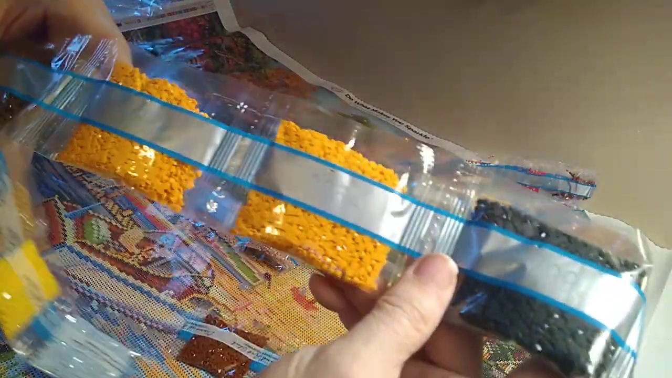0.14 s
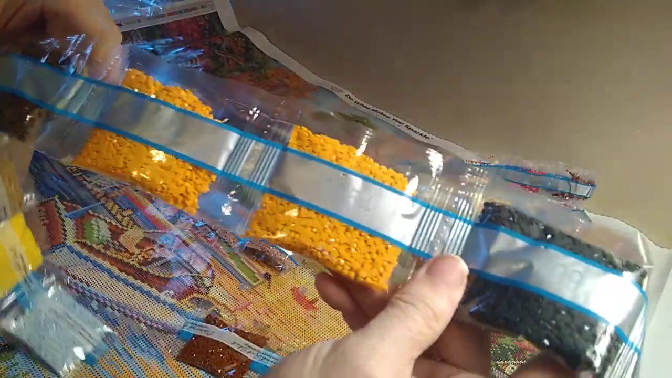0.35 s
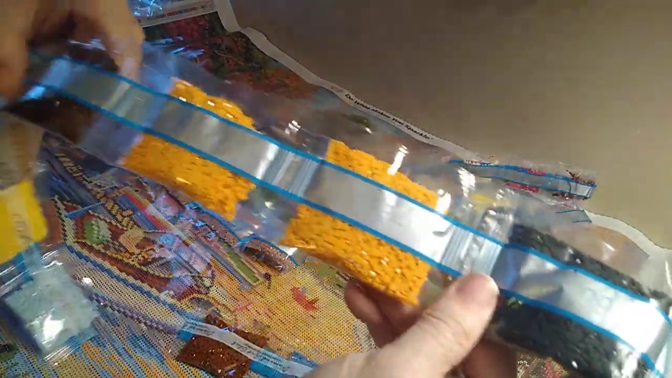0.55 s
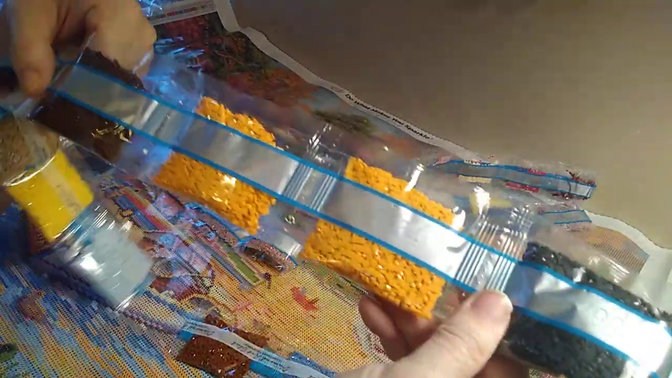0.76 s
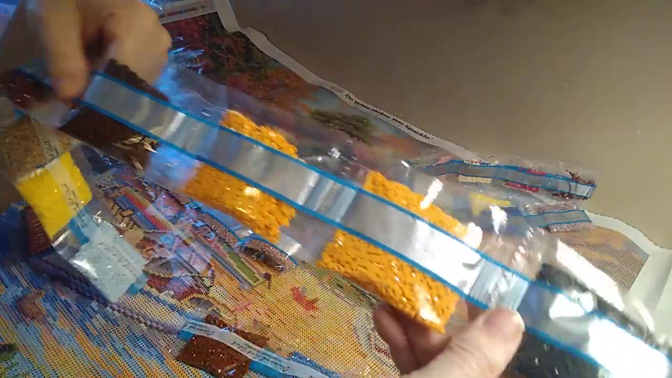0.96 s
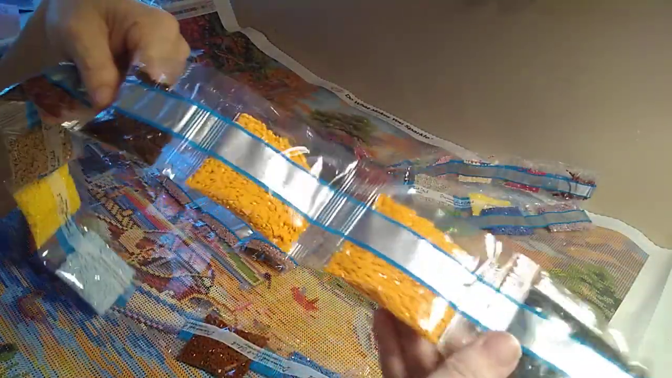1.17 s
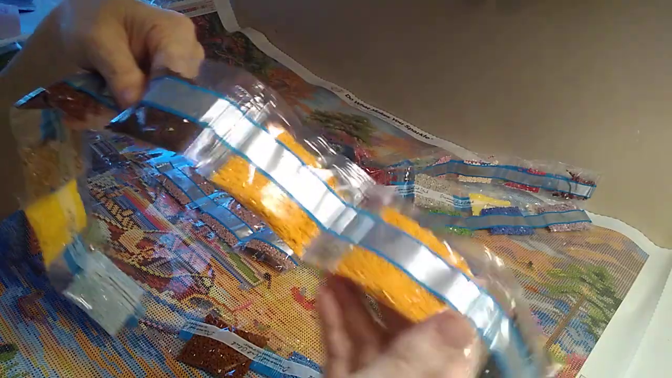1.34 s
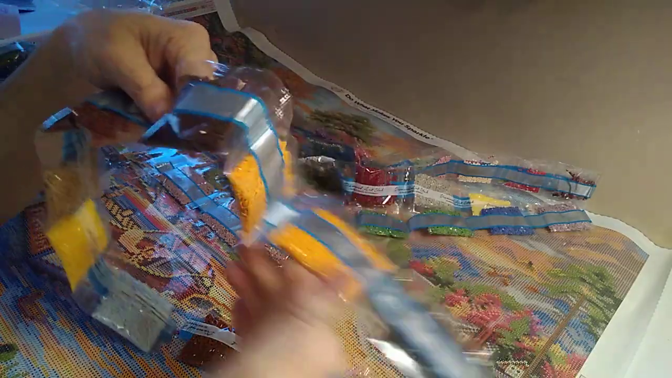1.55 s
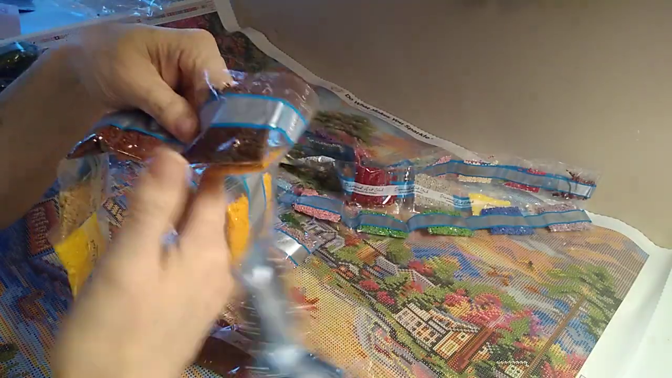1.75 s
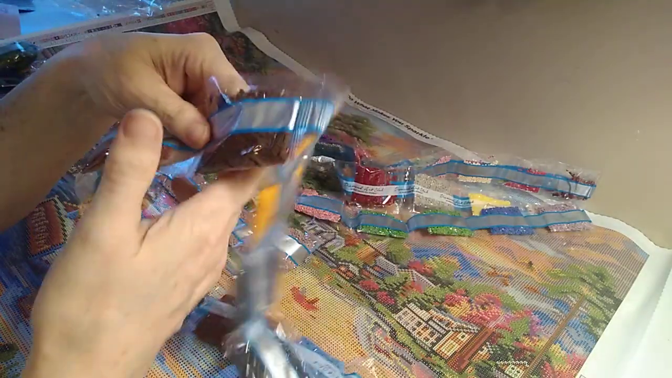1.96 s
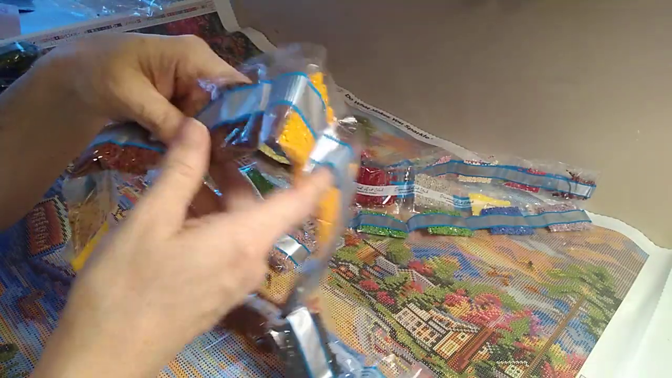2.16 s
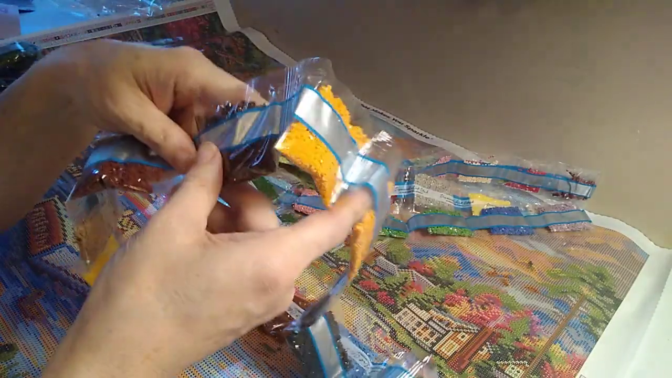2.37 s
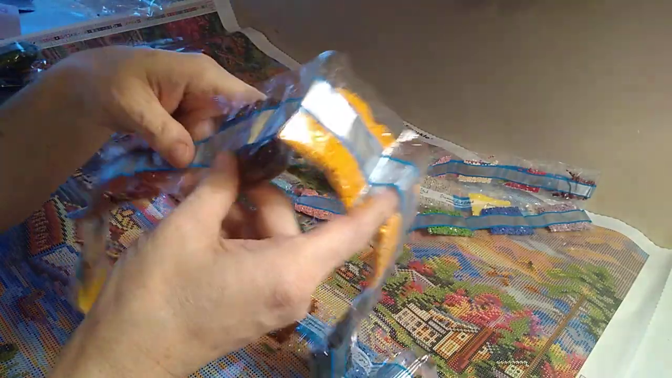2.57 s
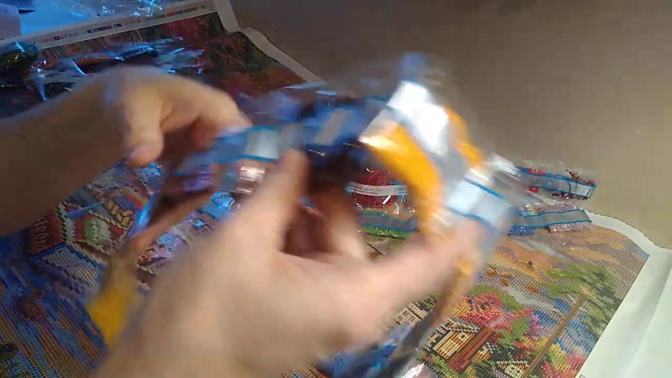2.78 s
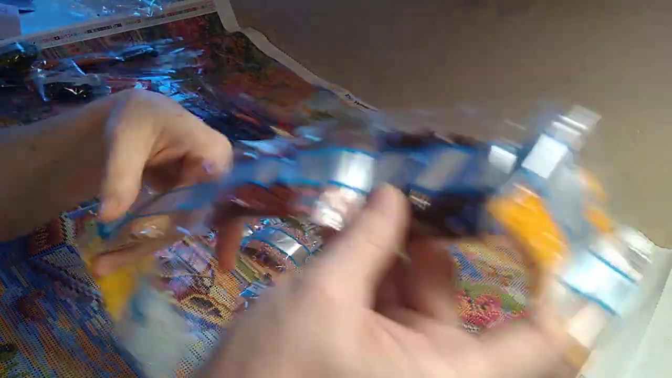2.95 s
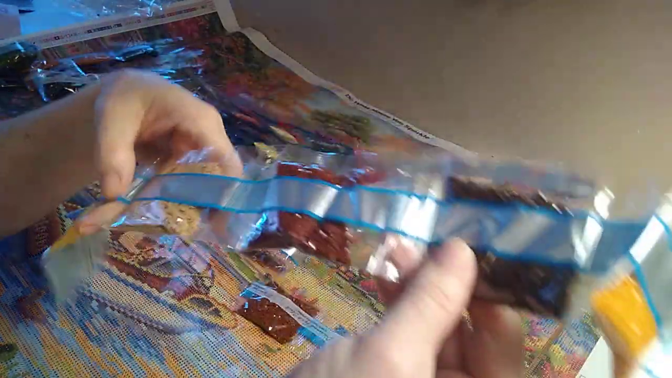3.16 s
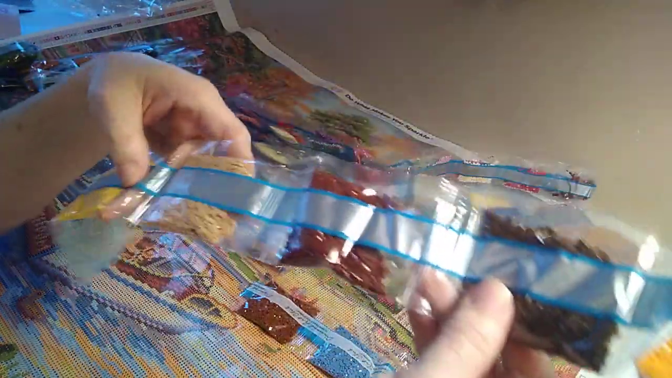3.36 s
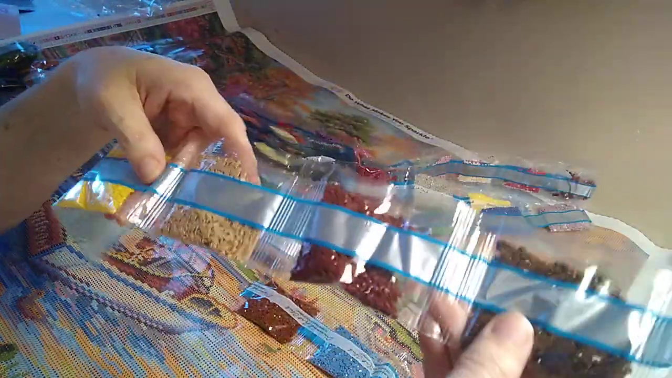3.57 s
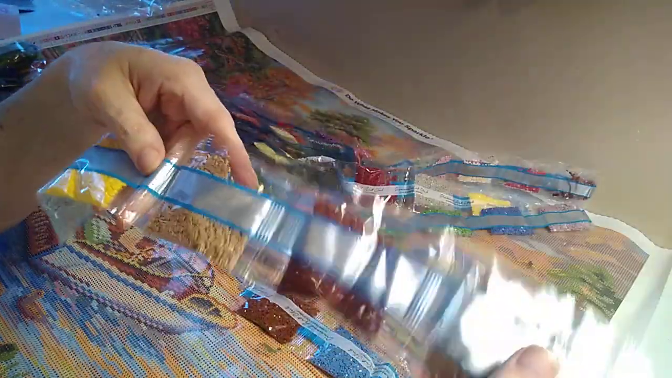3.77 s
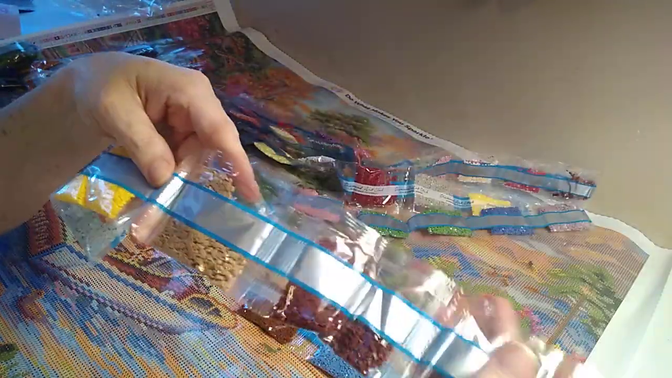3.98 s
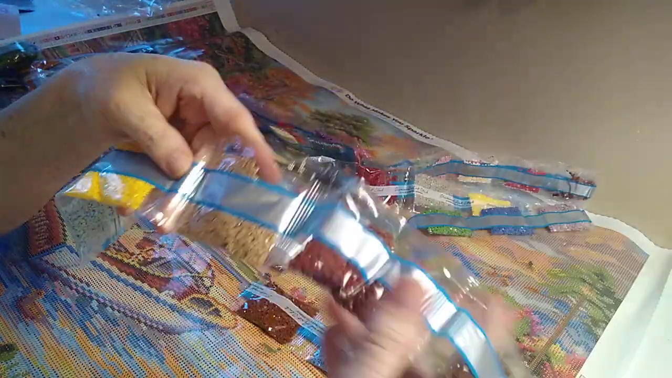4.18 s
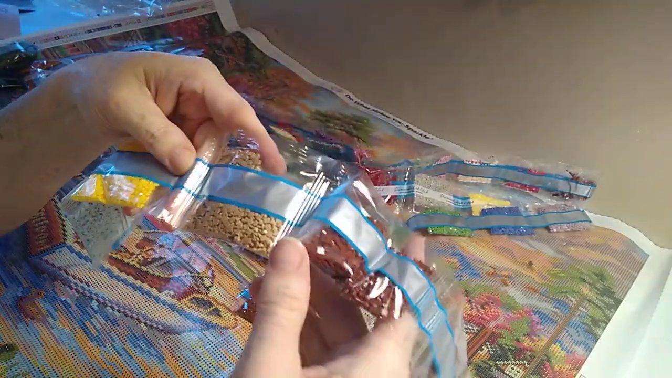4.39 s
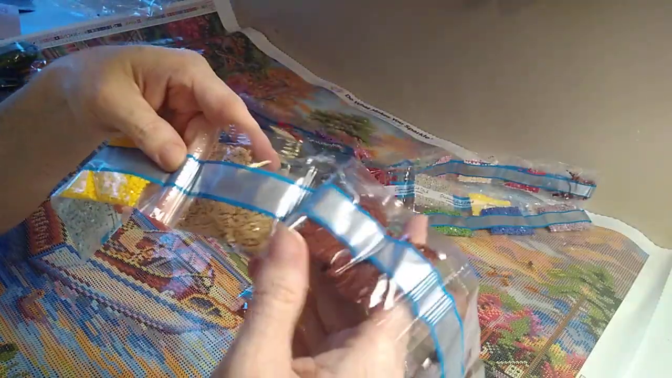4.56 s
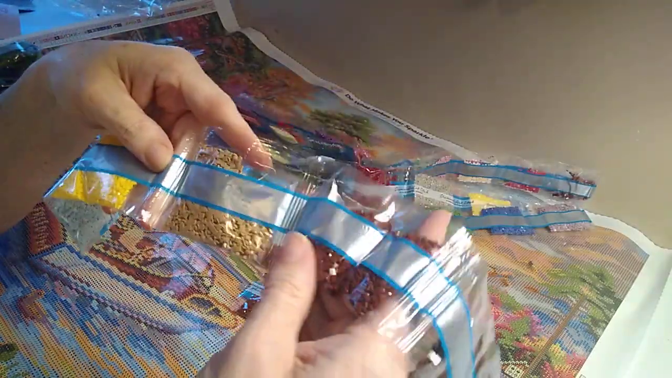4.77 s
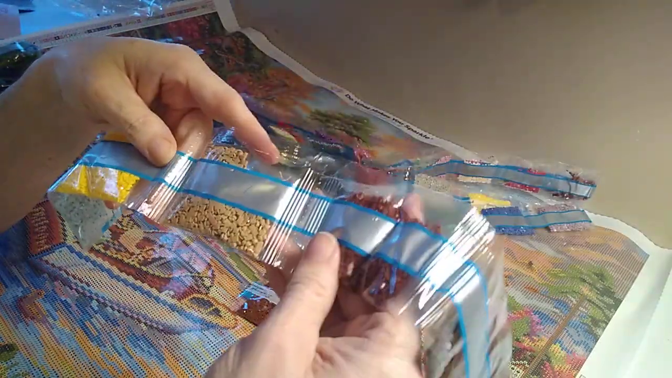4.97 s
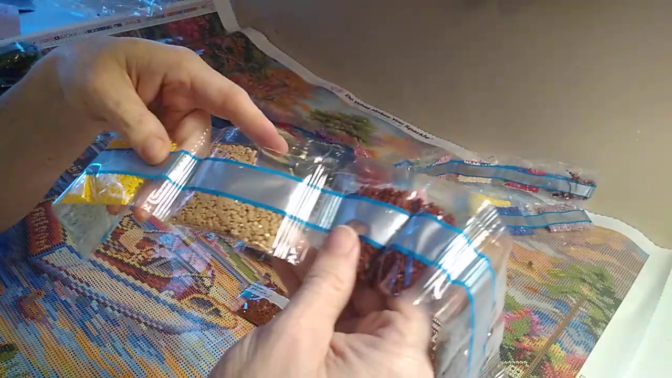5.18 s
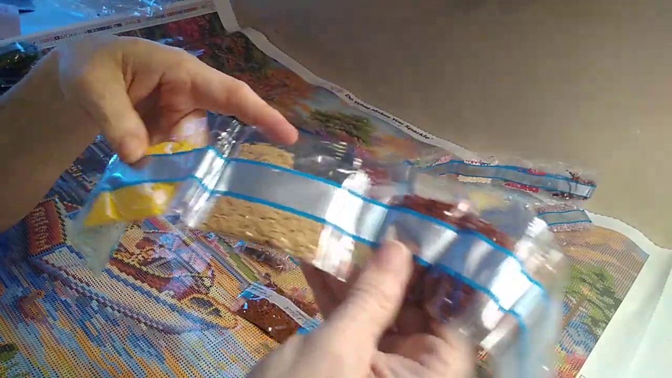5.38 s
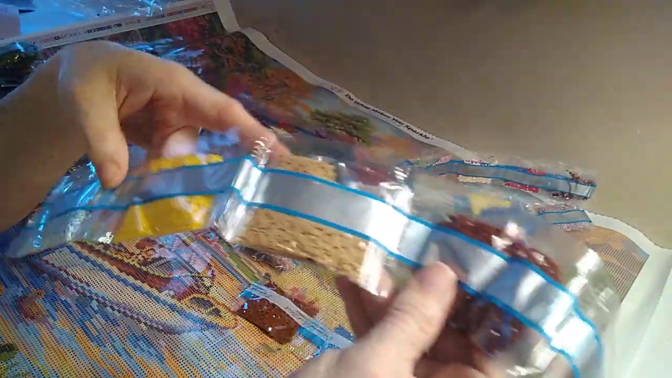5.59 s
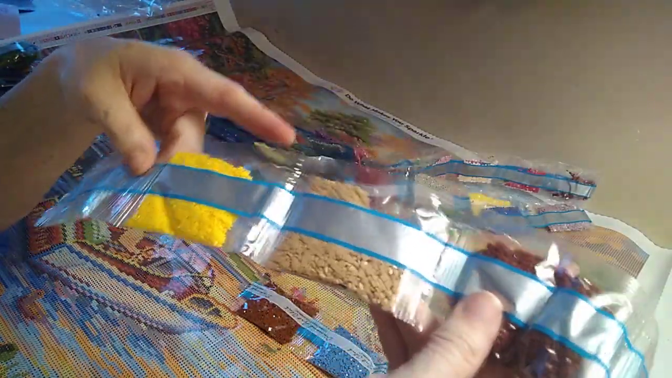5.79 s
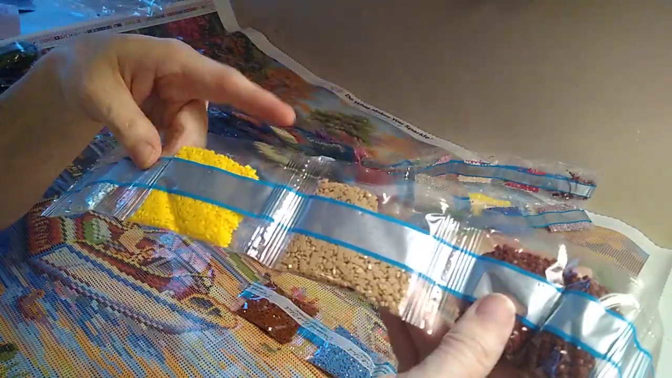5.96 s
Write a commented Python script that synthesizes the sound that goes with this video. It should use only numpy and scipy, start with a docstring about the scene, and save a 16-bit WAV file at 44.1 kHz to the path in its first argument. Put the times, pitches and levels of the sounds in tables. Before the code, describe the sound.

A strip of stiff plastic bags full of tiny beads is handled close to a stereo microphone above a table in a small room. From 0 to 1 s there are light crackles and separate snaps, beginning near 0.2 s. From 1 to 2.4 s the creases snap faster, with bright crinkling and grainy bead ticking leaning left; a sharp crack stands out near 1.95 s. Around 2.7 to 3.05 s come the strongest cracks, with bag walls popping at 2.7 and 2.8 s. Bursts continue at 3.2 and 3.55 s, then a dense cluster from 3.8 to 4.2 s, well to the left. After a brief lull near 4.6 s, sparser snaps follow around 5 s, fading into small ticks and soft rustle by 6 s. Short table reflections and a quick room tail surround it, with a faint, steady low fan hum throughout.

```python
"""Strip of bead bags turned by hand

A strip of small plastic bags full of beads is turned over by hand above a table, close to the microphones.
Creases in the stiff film snap and smaller ones tick: each is an impulse with a short noisy flutter.
Dense random clicks make the crackle and the shifting beads; a bag wall popping through is one pressure swing.
Early echoes and a decaying noise tail give the table and a small room; a fan of sines and noise hums behind."""
import sys
import numpy as np
from scipy import signal
from scipy.fft import rfft, irfft, next_fast_len
from scipy.io import wavfile

SR = 44100
rng = np.random.default_rng(int(sys.argv[2]) if len(sys.argv) > 2 else 0)


def store_wav(level_fs):
    """Save 16-bit WAV to argv[1]."""
    pcm = np.round(np.clip(np.atleast_2d(level_fs), -1, 1) * 32767)
    wavfile.write(sys.argv[1], SR, pcm.T.astype(np.int16))


N = 265923
TIME = np.arange(N) / SR
# left and right shares of a left-minus-right level in dB
SIDES = np.array([[.5], [-.5]])


def undb(db):
    """Decibels to gain."""
    return 10 ** (np.asarray(db) / 20)


def curve(table, t):
    """The columns of a table, interpolated at times t."""
    times, *columns = np.transpose(table)
    return [np.interp(t, times, column) for column in columns]


def shape(points, hz):
    """A (frequency [Hz], level [dB]) spectrum read on a log frequency axis."""
    f, db = np.transpose(points)
    return np.interp(np.log(hz + 1), np.log(f), db)


def colour(x, points):
    """Filter with the given (frequency [Hz], level [dB]) spectrum, made causal by folding its cepstrum."""
    size = 2 * next_fast_len(x.shape[-1])
    bins_hz = np.arange(size // 2 + 1) * SR / size
    cepstrum = irfft(shape(points, bins_hz) * np.log(10) / 20)
    # minimum phase: double the first half, drop the second
    cepstrum[1:size // 2] *= 2
    cepstrum[size // 2 + 1:] = 0
    response = np.exp(rfft(cepstrum))
    return irfft(rfft(x, size) * response)[..., :x.shape[-1]]


def unit(x):
    """Scale to rms 1."""
    return x / np.sqrt(np.mean(x ** 2))


def walk(rate):
    """Slow random curve with a spread near 1 and the given number of knots per second."""
    knots = np.arange(0, N / SR + 1, 1 / rate)
    return np.interp(TIME, knots, rng.standard_normal(len(knots))) * np.sqrt(3 / 2)


def add(out, s, sound):
    """Mix a sound in at time s."""
    start = int(np.clip(round(s * SR), 0, N - 1))
    out[:, start:start + sound.shape[1]] += sound[:, :N - start]


SHAFT_HZ = 18.585
# hum of the fan: (multiple of the shaft rate, level [dB])
FAN_TONES = [(3, -63), (5, -64.5), (10, -66), (12, -53), (13, -64), (15, -59), (16, -65.5), (17, -67),
             (20, -69), (41, -70.5)]
# spectrum of fan air and room rumble: (frequency [Hz], relative level [dB])
AIR = [(24, -49), (42, -0.5), (66, -5.5), (100, 5.5), (160, -4), (200, -2.5), (228, 4), (272, 2.5),
       (345, -14), (440, -9), (600, -15.5), (1000, -17), (2500, -32), (16000, -46)]
AIR_DB = -48


def fan(pan_db=1.5, waver_db=2.2, drift_hz=.05):
    """Wavering shaft tones over air noise; the bass is alike on both sides."""
    turns = np.cumsum(SHAFT_HZ + drift_hz * walk(2.95)) / SR
    tones = np.zeros(N)
    for multiple, db in FAN_TONES:
        level = np.sqrt(2) * undb(db + waver_db * walk(5))
        tones += level * np.sin(2 * np.pi * (round(multiple) * turns + rng.random()))
    # noise of opposite sign on the two sides, weak in the bass
    side = colour(rng.standard_normal(N), [(60, -16), (290, -19), (520, -7), (2000, -3), (6000, 0)])
    air = unit(colour(rng.standard_normal(N) + 2 * SIDES * side, AIR))
    return (tones + undb(AIR_DB) * air) * undb(pan_db * SIDES)


# reflections off the table and nearby things: (nominal delay [s], level [dB])
ECHOES = [(.0012, -19.5), (.003, -10), (.0044, -12), (.0095, -15)]


def echoes(wander=0.16, size=1024):
    """Direct sound and the nearest reflections for one position of the bags, which shifts the delays."""
    response = np.zeros((2, size))
    response[:, 0] = 1
    for s, db in ECHOES:
        # one shift shared by both sides, plus a smaller one for each
        shift = rng.uniform(-1, 1) + rng.uniform(-1, 1, 2) / 2
        lags = SR * s * (1 + wander * shift)
        response[[0, 1], np.clip(lags, 1, size - 1).astype(int)] += undb(db)
    return response


def tail(t60_s=0.33, treble_t60_s=0.23, split_hz=7000, onset_s=0.00034, size=16000):
    """Diffuse response of unit energy: decaying noise whose treble dies sooner."""
    t = np.arange(size) / SR

    def band(kind):
        """Noise on one side of the split."""
        sos = signal.butter(2, split_hz, kind, fs=SR, output="sos")
        return signal.sosfilt(sos, rng.standard_normal((2, size)))

    y = band("low") * undb(-60 * t / t60_s) + band("high") * undb(-60 * t / treble_t60_s)
    y *= 1 - np.exp(-t / onset_s)
    return y / np.linalg.norm(y, axis=1, keepdims=True)


def room(direct, radiated, wet_db=-6, blend=0.21, size=8192):
    """The bags keep moving, so each short stretch of sound meets a different set of reflections."""
    out, fade = np.zeros((2, N)), signal.windows.hann(size, sym=False)
    # the diffuse sound is more even between the sides than the direct sound
    diffuse = undb(wet_db) * (radiated + blend * (radiated[0] - radiated))
    for start in range(0, N, size // 2):
        for x, response in ((direct, echoes()), (diffuse, tail())):
            piece = x[:, start:start + size]
            faded = piece * fade[:piece.shape[1]]
            add(out, start / SR, signal.fftconvolve(faded, response, axes=-1))
    return out


# the grip that keeps the film under slight strain between flexes: (time [s], effort [dB])
GRIP = [(0, -64), (0.35, -62.5), (0.5, -56.5), (1.9, -50.5), (2.52, -58), (3.15, -54), (3.5, -59.5),
        (4.3, -51.5), (4.62, -71), (4.9, -58), (6.03, -68.5)]
# the fingers flex the strip, one burst of crinkling each: (start [s], length [s], effort [dB])
FLEXES = [(0.191, .02, -43), (0.473, 0.1, -46), (0.756, 0.17, -49), (1.085, .21, -52), (1.366, 0.2, -44),
          (1.6, 0.055, -41.5), (1.719, 0.16, -44), (1.825, 0.062, -36.5), (1.913, 0.069, -42.5),
          (2.024, 0.14, -48), (2.305, 0.056, -38.5), (2.65, 0.13, -49), (2.819, 0.042, -41.5),
          (3.16, 0.081, -41), (3.23, 0.17, -47.5), (3.54, 0.38, -52), (3.821, 0.071, -42),
          (3.879, 0.096, -36.5), (3.991, 0.22, -47), (4.306, 0.043, -45), (4.388, .12, -49),
          (4.832, .14, -48), (5.4, 0.13, -53), (5.811, 0.016, -52), (5.886, .09, -61.5)]
FLEX_ATTACK_S, FLEX_RELEASE_S = .015, .018


def effort():
    """How hard the strip is bent, in dB: each flex builds up, holds and lets go, on top of the steady grip."""
    power = undb(curve(GRIP, TIME)[0]) ** 2
    for s, length, db in FLEXES:
        rise = np.clip((TIME - s) / FLEX_ATTACK_S, 0, 1)
        fall = np.exp(-np.maximum(TIME - s - length, 0) / FLEX_RELEASE_S)
        power = power + (undb(db) * rise * fall) ** 2
    return 10 * np.log10(power)


def facet():
    """Each patch of film favours the band that suits its size: a broad hump at a random pitch."""
    hz = 900 * 6 ** rng.random()
    return [(hz / 1.7, -1.5), (hz, 4), (hz * 1.7, -1.5), (11000, 0)]


def flick(flutter_db, flutter_s, lag, treble_loss_db=-5, size=512):
    """One buckle of unit energy: an impulse, then the film flutters, duller and differently towards each side."""
    flutter = rng.standard_normal((2, size)) * np.exp(-np.arange(size) / SR / flutter_s)
    flutter *= undb(flutter_db) / np.linalg.norm(flutter, axis=1, keepdims=True)
    y = colour(flutter, [(4500, 0), (11000, treble_loss_db)])
    y[0, 0] += 1
    # the right side hears the impulse up to 10 samples later
    y[1, int(np.clip(round(lag), 0, 10))] += 1
    return y / np.linalg.norm(y, axis=1, keepdims=True)


def grains(rate, spread_db, flutter_s, count=24):
    """Random tiny clicks of very unequal size, in little avalanches, from many spots on the strip; rms 1."""
    out, avalanche = np.zeros((2, N)), undb(4 * walk(60))
    for spot in range(count):
        struck = rng.random(N) < rate * avalanche / count / SR
        size = np.minimum(rng.exponential(size=N), 3.5)
        clicks = struck * undb(spread_db * size) * rng.choice([-1, 1], N)
        click = colour(flick(9.8, flutter_s, spot / 3), facet())
        out += signal.oaconvolve(clicks[None], click, axes=-1)[:, :N]
    # busier stretches get denser here, not louder
    return unit(out / np.sqrt(rate))


# where the film is bending: (time [s], left minus right [dB])
PLACE = [(0, -1.5), (1.05, 1.5), (1.5, 6), (3.05, 0), (3.75, 6.5), (4.6, 6.5), (5.15, 3), (6.03, 1)]
# spectrum of the fine crackle: (frequency [Hz], relative level [dB])
CRACKLE = [(300, -9), (1500, -13.5), (4500, -2), (7800, -1.5), (9800, 6.5), (12200, 11.5), (14000, 8.5),
           (16000, 2)]
# spectrum of the beads: (frequency [Hz], relative level [dB])
BEADS = [(200, -2.5), (430, 4), (850, 0.5), (1600, -0.5), (3000, 3.5), (5000, 2), (8000, -4), (16000, -21)]


def rustle(effort_db, film_gain_db=-0.5, bead_gain_db=-2.5, film_growth=1.09, bead_growth=0.91,
           crowding=.55, bead_pan=0.22):
    """Fine creases crackle and beads tick on the film; brisker handling makes more of both, the crackle above all."""
    film_rate, bead_rate = 800, 700  # clicks per second at usual effort, before the avalanches
    usual_db = np.mean(effort_db)
    extra_db = effort_db - usual_db
    pan_db, = curve(PLACE, TIME)
    busy = undb(crowding * extra_db)
    film = unit(colour(grains(film_rate * busy, spread_db=5.5, flutter_s=.0008), CRACKLE))
    beads = unit(colour(grains(bead_rate * busy, spread_db=5.0, flutter_s=.001), BEADS))
    film *= undb(usual_db + film_growth * extra_db + film_gain_db + pan_db * SIDES)
    beads *= undb(usual_db + bead_growth * extra_db + bead_gain_db + bead_pan * pan_db * SIDES)
    return film + beads


# radiation of the film, for ticks and snaps alike: (frequency [Hz], relative level [dB])
FILM = [(150, -15), (400, -5), (900, -4), (1600, -1.5), (4200, -0.5), (7800, -2.5), (9500, 0.5), (11800, 6),
        (15500, 4)]


def ticks(effort_db, gain_db=23, spread_db=3., treble_db=-3.5, flutter_db=-1, flutter_s=0.00097,
          scatter_pan_db=4, count=480):
    """Lesser creases flip at random between the big ones, each with its own colour and place."""
    out = np.zeros((2, N))
    for s, size, bright, place, luck in rng.random((count, 5)) * [N / SR, 1, 1, 1, 1]:
        bend_db = effort_db[int(s * SR)]
        pan_db = curve(PLACE, s)[0] + scatter_pan_db * (2 * place - 1)
        # a small crease needs some energy to flip and can store only so much, however hard the strip is bent
        strain_db = np.clip(bend_db, -54, -44)
        db = strain_db + gain_db - spread_db * np.log(max(size, .1))
        tint = [(600, -2), (1500, 2.5), (4500, -1.5), (11000, treble_db + 10 * (2 * bright - 1))]
        click = colour(colour(flick(flutter_db, flutter_s, pan_db / 2), facet()), tint)
        # film that lies nearly still seldom flips
        if luck < np.interp(bend_db, [-60, -48], [.03, 1]):
            add(out, s, undb(db + pan_db * SIDES) * click)
    return colour(out, FILM)


# a bag wall popping through: (time [s], level [dB], centre [Hz])
POPS = [(0.7608, -33, 1400), (1.4536, -25.5, 750), (2.042, -31, 1020), (2.3471, -32, 540),
        (2.7156, -10, 2330), (2.7187, -10, 1950), (2.8305, -8.5, 1950), (3.0145, -35, 484),
        (4.958, -30.5, 805)]


def pops(pan_db=2.0, size=128):
    """A whole wall jumps to its other shape and sends out a single swing of pressure."""
    out, t = np.zeros((2, N)), (np.arange(size) - size / 2) / SR
    for s, db, hz in POPS:
        u = (np.pi * hz * t) ** 2
        swing = (2 * u - 1) * np.exp(-u)
        add(out, s + t[0], undb(db + pan_db * SIDES) * swing)
    return out


# the big creases snapping: (time [s], mid level [dB], bass over mid [dB], treble over mid [dB],
# left minus right [dB])
SNAPS = [(0.1889, -11.5, -6, 6.5, 6), (0.199, -11.5, 2, 9.5, -1.5), (0.4143, -7.5, 7, -8.5, 3.5),
         (0.6195, -20.5, -11, 12, 1), (0.7209, -15.5, 7, 0.5, 1.5), (0.8502, -9, -4, -0.5, 1),
         (0.9193, -6, 4.5, -2.5, 2.5), (0.9729, -19, 3, 5.5, -4), (1.0222, -6, -4, -2.5, -1.5),
         (1.1375, -15, -10, 9.5, 10), (1.2225, -5, -4, 0, 0), (1.261, -7, 2, 0, 2),
         (1.3052, -10.5, 4.5, -3.5, 3), (1.3736, -8, -12, -1, 3.5), (1.385, -8.5, -6, 3.5, 11.5),
         (1.4423, -6, -12, 3, 10.5), (1.4536, -4, 3, -7, 9), (1.5163, -7.5, 0.5, 1.5, 6.5),
         (1.625, -11.5, 6, 5.5, 5.5), (1.7212, -14, 13, -8, 4), (1.7399, -17, -4, 0, -10),
         (1.803, -6, -7, -4.5, 9), (1.8398, -4.5, -12, 0, 10.5), (1.947, 3.5, -31, -9, 6),
         (2.002, -10, -6, -1, 12), (2.0588, -7, -1, 0, 10), (2.0696, -3.5, -7, -2, -2.5),
         (2.0892, -15, -7, 11, 4.5), (2.1189, -7, 1.5, -0.5, 1.5), (2.1786, -13.5, 10, 5, 6),
         (2.2336, -6.5, -0.5, 2, 8.5), (2.2492, -4.5, -9, -16, -3), (2.276, -6, -12, 2.5, 2.5),
         (2.318, -9.5, -6, -1, 2.5), (2.3358, -10, -5, 7, 12), (2.3485, -1.5, 1, -1.5, 4.5),
         (2.4454, -11, 3, -1, 8), (2.5497, -13.5, -10, 0.5, 7.5), (2.655, -13.5, 4, 3, 6),
         (2.686, -3, -1, -5.5, 1.5), (2.7159, 3, -23, -2.5, 4.5), (2.803, -2, 4.5, 2.5, 6.5),
         (2.9353, -1.5, -1.5, 0, 4.5), (3.0135, 1.5, -2.5, 0.5, -0.5), (3.053, -9, 5.5, 1, 3),
         (3.2019, -4.5, -2.5, -0.5, 0.5), (3.2631, -10, 7, 0.5, 10.5), (3.3246, -7, -2, 3, 10.5),
         (3.5478, -5.5, -3, -2, 5.5), (3.6426, -9, -2, -8, 7), (3.6608, -8.5, -15, -8, 1),
         (3.7989, -5, 8, -2, 13), (3.832, -14.5, -12, 10.5, 8.5), (3.8555, -2.5, 4, -3, 11),
         (3.9168, -3, -4, 0.5, 8.5), (4.0218, -8, 8, -17, -1), (4.0925, -5.5, -6, -11, 5.5),
         (4.135, -4.5, 1.5, -7, 7), (4.158, -4.5, -3, -7, 16), (4.1855, -5, -14, 4.5, 9),
         (4.5029, -9, 4, -0.5, 9), (4.8385, -11, 6.5, -7, 4), (4.9694, -2.5, -6, -0.5, 6.5),
         (5.054, -8, -12, 5, 7.5), (5.1208, -17, -8, 3.5, 7), (5.17, -18, -17, -4, 0),
         (5.2717, -16, 1, -5, 4.5), (5.2866, -22.5, 4, 3, 1.5), (5.3213, -10.5, -1, -4.5, 4.5),
         (5.406, -12.5, 5, -4.5, 3.5), (5.487, -15, 1, 1, 2.5), (5.567, -8, -7, 1, -1.5),
         (5.82, -18, -15, 0.5, -1), (5.9239, -10.5, -11, 0, 3), (5.978, -14.5, 3, -1.5, 1)]


def snaps(flutter_db=2.0, flutter_spread_db=3.0, flutter_s=0.0018, mid_pan=0.23, lag_per_db=0.6):
    """Creases flip one by one, some in a clean crack and some with a flutter; treble is the most directional."""
    out = np.zeros((2, N))
    for s, db, bass_db, treble_db, pan_db in SNAPS:
        ring_db = flutter_db + flutter_spread_db * (2 * rng.random() - 1)
        click = colour(flick(ring_db, flutter_s, 1.5 + lag_per_db * pan_db), facet())
        for side, p in enumerate(pan_db * SIDES[:, 0]):
            mid = mid_pan * p
            tint = [(800, bass_db + mid), (1900, mid), (4800, mid), (11000, treble_db + p)]
            click[side] = colour(click[side], tint)
        add(out, s, undb(db) * click)
    return colour(out, FILM)


def scene(pop_room_db=-5):
    """The bags in the room, with the fan behind; a popping wall faces the microphones and so sounds drier."""
    effort_db = effort()
    crinkle = rustle(effort_db) + ticks(effort_db) + snaps()
    walls = pops()
    return fan() + room(crinkle + walls, crinkle + undb(pop_room_db) * walls)


TOP_HZ = 15750


def record(dry):
    """The recorder cuts the top with a steep low-pass."""
    return signal.sosfilt(signal.ellip(8, .2, 70, TOP_HZ, fs=SR, output="sos"), dry)


dry = scene()
out = record(dry)
store_wav(out)
```